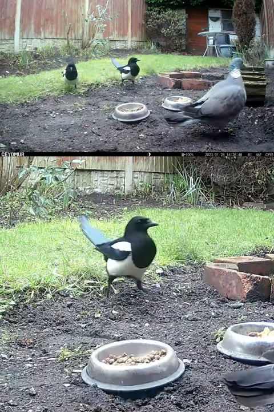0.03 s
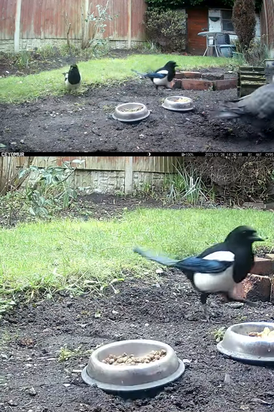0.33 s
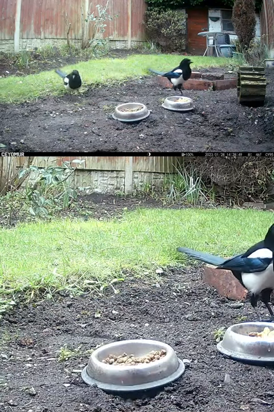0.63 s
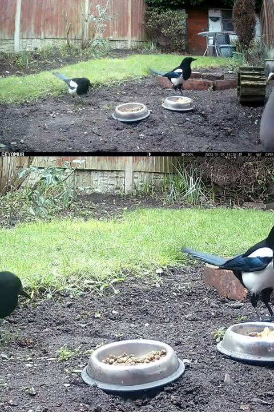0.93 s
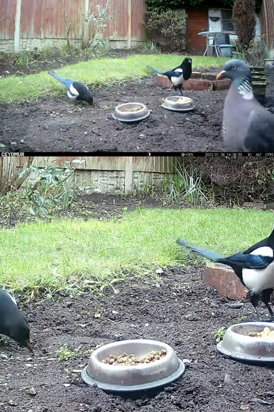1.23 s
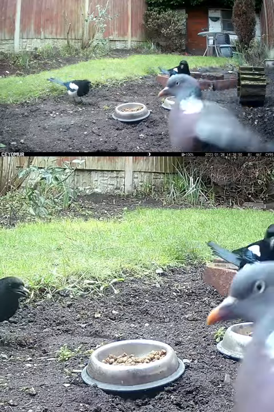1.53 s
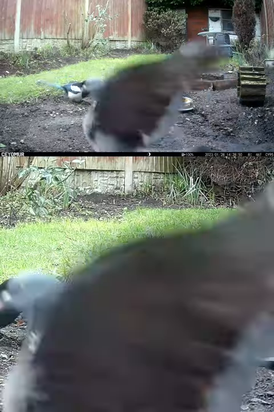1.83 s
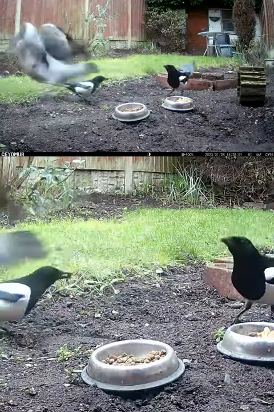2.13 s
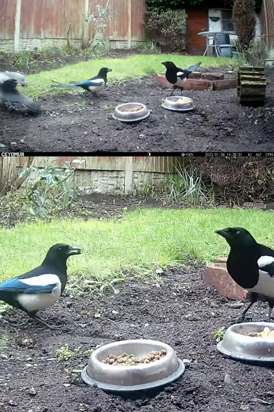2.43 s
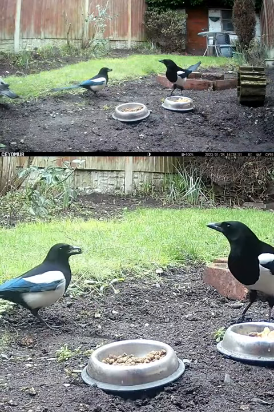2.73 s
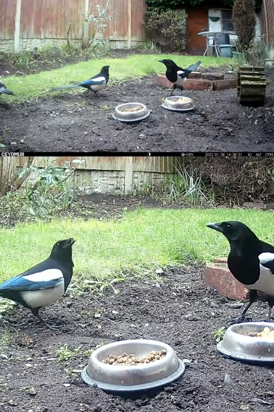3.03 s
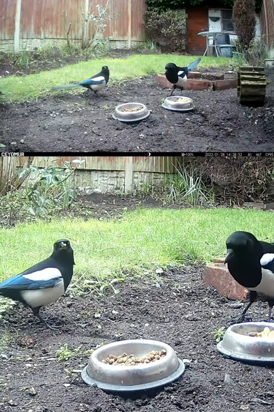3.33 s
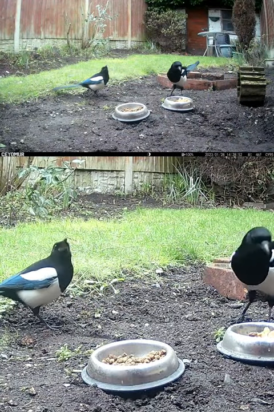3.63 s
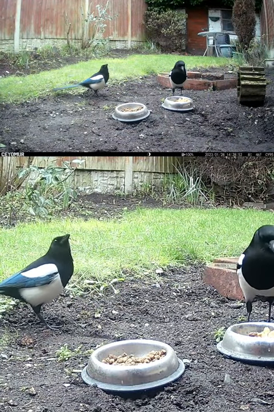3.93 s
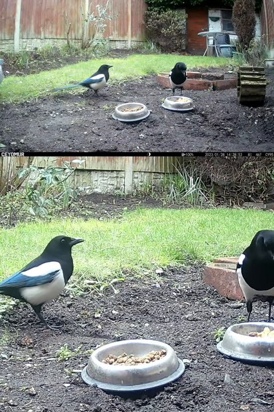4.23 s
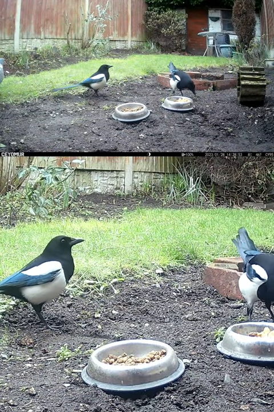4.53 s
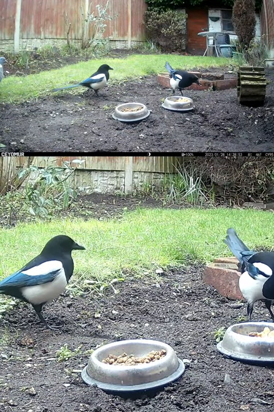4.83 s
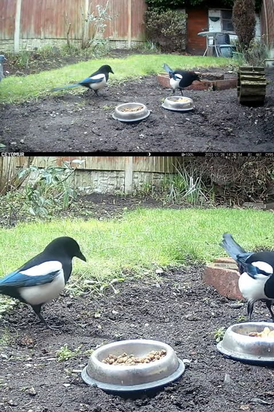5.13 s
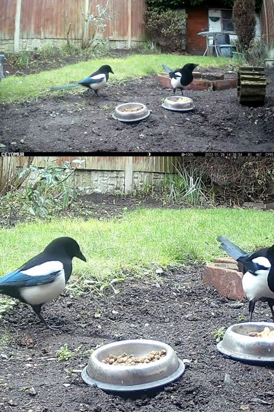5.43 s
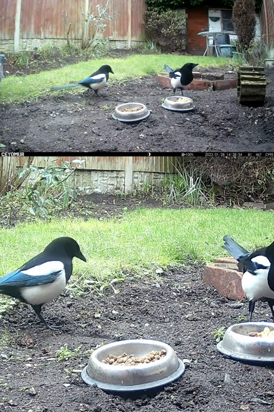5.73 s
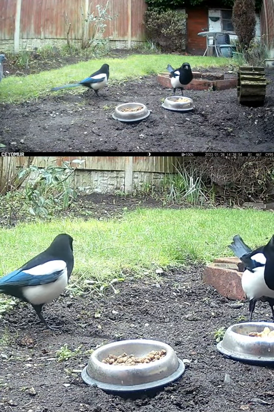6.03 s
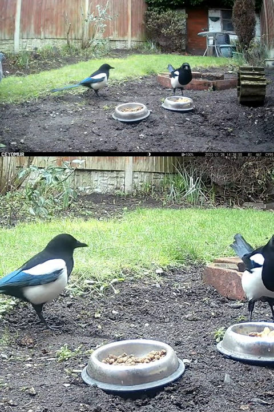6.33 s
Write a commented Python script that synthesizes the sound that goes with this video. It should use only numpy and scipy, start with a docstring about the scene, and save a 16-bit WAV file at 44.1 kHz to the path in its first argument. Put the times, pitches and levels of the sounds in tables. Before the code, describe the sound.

A pigeon steps softly over soil, then takes off close by with rustling feathers and dull wing claps, over quiet hiss and faint electronic blips.

```python
"""A wood pigeon walks past a trail camera on the ground of a garden and takes off right in front of it.
Its feet thud on soft soil, grit clicks, and its feathers rustle as they slide over each other.
The wings push air at the microphone, make the camera's case ring and clap dully as the bird leaves.
Underneath are a distant low drone, a light breeze, the garden's murmur and the camera's own hiss,
with faint ticks and blips from its electronics."""
import sys
import numpy as np
from scipy import signal
from scipy.fft import rfft, irfft, next_fast_len
from scipy.io import wavfile
from scipy.ndimage import uniform_filter1d

SR = 44100
rng = np.random.default_rng(int(sys.argv[2]) if len(sys.argv) > 2 else 0)


def wrap_up_sound(samples):
    """Save the sound to the file named by the first command line argument, as 16-bit audio."""
    columns = np.atleast_2d(samples).T
    # keep every value between -1 and 1, then stretch to whole-number steps
    tamed = np.clip(columns, -1, 1)
    steps = np.round(tamed * 32767).astype(np.int16)
    wavfile.write(sys.argv[1], SR, steps)


N = 280917


def undb(db):
    """Turn decibels (dB) into a number to multiply a sound by."""
    return 10 ** (np.asarray(db) / 20)


def seconds():
    """The time of every sample."""
    return np.arange(N) / SR


def unit(x):
    """Scale a sound so that its average strength (rms) is 1."""
    return x / np.sqrt(np.mean(x ** 2))


def noise():
    """White noise: all pitches equally strong."""
    return rng.standard_normal(N)


def shape(x, gain_at):
    """Turn each frequency up or down by gain_at(hz); the result has strength 1."""
    size = next_fast_len(N, real=True)
    hz = np.maximum(np.fft.rfftfreq(size, 1 / SR), 1)
    return unit(irfft(rfft(x, size) * gain_at(hz), size)[:N])


def colour(x, points):
    """Make a sound duller or brighter, following a table of frequencies and relative levels."""
    hz, db = np.transpose(points)
    return shape(x, lambda f: undb(np.interp(np.log(f), np.log(hz), db)))


def resonate(x, hz, width):
    """Make a sound ring around one pitch; the result has strength 1."""
    return unit(signal.lfilter(*signal.iirpeak(min(hz, SR / 2 - 1), hz / width, fs=SR), x))


def swell(at, rise, fall):
    """A level that climbs smoothly to 1 at the given time, then dies away."""
    t = seconds() - at
    return np.exp(-np.minimum(np.where(t < 0, (t / rise) ** 2, t / fall), 20))


def drift():
    """A slow random wobble, a few times a second."""
    return shape(noise(), lambda f: 1 / (1 + (f / 4) ** 4))


def snap(at, hz, width, fall):
    """A tiny burst of noise around one pitch, with strength about 1 at its start."""
    burst = noise() * swell(at, 0.00025, fall)
    return resonate(resonate(burst, hz, width), hz, width) * np.sqrt(fall * SR / 2 / N)


# How the drone swells and fades. Each row: time in seconds, level in dB before trim_db is added.
DRONE_LEVELS = [(0.0, -70), (0.27, -53.5), (0.48, -63), (0.69, -51), (0.96, -64), (1.08, -51), (2.8, -54),
                (2.95, -58), (3.25, -51), (3.76, -50), (4.0, -58.5), (4.18, -50.5), (4.75, -63),
                (5.71, -54.5), (5.8, -75), (5.98, -60), (6.34, -55)]


def drone(hz=53.36, wander_hz=0.98, trim_db=-1):
    """A far-off, engine-like hum whose pitch wanders a little."""
    phase = 2 * np.pi * np.cumsum(hz + wander_hz * drift()) / SR
    level_db = np.interp(seconds(), *np.transpose(DRONE_LEVELS)) + trim_db
    return np.sqrt(2) * np.sin(phase) * undb(level_db)


# The pitches at which the camera's case rings. Each row: pitch in Hz, width in Hz,
# relative level in dB when a wing shakes it, base level in dB in the garden's murmur.
CASE_RINGS = [(458, 21.6, 12.5, -69.5), (716, 160, -1, -81), (978, 107, -36, -69.5), (1123, 57, 2.5, -71.5),
              (2880, 300, -3, -81.5)]
# The low rumble of the breeze. Each row: frequency in Hz, relative level in dB.
BREEZE_COLOUR = [(10, 0), (25, -2), (45, 2), (62, 0), (80, -14.5), (150, -17.5), (400, -50)]
# The air stirs more while the pigeon is near. Each row: time in seconds, change of level in dB.
AIR_STIR = [(0, 0), (2.4, 4.0), (2.9, 0), (6.4, -1.5)]


def garden_air(breeze_db=-59, waver_db=0.8):
    """A light breeze blows, and the garden's murmur is heard through the ringing case."""
    change_db = waver_db * drift() + np.interp(seconds(), *np.transpose(AIR_STIR))
    murmur = sum(undb(db) * resonate(noise(), hz, width) for hz, width, _, db in CASE_RINGS)
    breeze = undb(breeze_db) * colour(noise(), BREEZE_COLOUR)
    return (murmur + breeze) * undb(change_db)


# The tone of the hiss. Each row: frequency in Hz, relative level in dB.
HISS_COLOUR = [(20, 18.5), (60, 2.5), (108, 15), (160, 3), (330, 6.5), (600, 3.5), (1400, 3), (1850, 3.5),
               (2400, 0.83), (6000, -1), (9800, -1.5), (11500, -3), (13500, -1), (14800, -5.5),
               (15600, -5.5)]


def hiss(db=-57.5):
    """The microphone's amplifier hisses steadily."""
    return undb(db) * colour(noise(), HISS_COLOUR)


# Electrical ticks. Each entry: time in seconds.
TICK_TIMES = [0.0745, 0.6123, 1.0805, 2.7128, 3.0925, 4.0932, 4.813, 5.101, 6.1011]


def ticks(db=-47):
    """The camera's electronics leak short, high ticks into the sound."""
    return undb(db) * sum(snap(at, hz=9100, width=2800, fall=0.0012) for at in TICK_TIMES)


# The camera's bursts of work. Each row: start in seconds, length of a pause partway in seconds.
WORK_BURSTS = [(.125, 0), (.624, 0.0022), (1.122, 0.053), (2.488, 0.052), (3.088, 0), (3.622, 0.0043),
               (4.125, 0.0049), (4.630, .043), (5.121, 0.036), (5.626, .049)]
# Overtones of the camera's electronic clock. Each row: pitch in Hz, level in dB.
CLOCK_TONES = [(5513, -66.5), (8270, -78), (9648, -70), (12405, -65.5), (13783, -70)]


def blips(work_s=0.056, pause_after_s=0.023, rasp=0.24):
    """The clock's raspy whine leaks in while the camera works; each burst does equally long work."""
    t = seconds()
    busy = np.zeros(N)
    for at, pause in WORK_BURSTS:
        age = t - at
        before_pause = (age > 0) & (age < pause_after_s)
        after_pause = (age >= pause_after_s + pause) & (age < work_s + pause)
        busy += before_pause | after_pause
    busy = uniform_filter1d(busy, size=200)  # soften the switching on and off
    roughness = 1 + rasp * shape(noise(), lambda f: 1 / (1 + (f / 200) ** 2))
    whine = sum(np.sqrt(2) * undb(db) * np.sin(2 * np.pi * hz * t) for hz, db in CLOCK_TONES)
    return busy * roughness * whine


# The pigeon's steps. Each row: loudest moment in seconds, level in dB.
FOOTSTEPS = [(.338, -57.5), (.480, -52), (.743, -47.5), (1.072, -47.5), (1.640, -45.5), (1.885, -47.5),
             (2.412, -49)]
# The dull tone of soil. Each row: frequency in Hz, relative level in dB.
SOIL_COLOUR = [(30, -11.5), (70, -6), (110, 8), (160, -12), (220, -14.5), (400, -26.5), (800, -25.5),
               (2000, -47), (8000, -36)]


def steps():
    """Soil gives under the feet with a soft thud."""
    thuds = sum(undb(db) * swell(at, rise=0.021, fall=0.038) for at, db in FOOTSTEPS)
    return colour(noise(), SOIL_COLOUR) * thuds


# Small dry clicks. Each row: time in seconds, pitch in Hz, level in dB.
DRY_CLICKS = [(.4408, 9000, -55), (0.503, 700, -50), (.6735, 10200, -45), (0.725, 700, -44.5),
              (.9085, 12000, -48), (5.1085, 6900, -47)]


def clicks(widest_hz=3900):
    """Grit, claws and beak click now and then; low knocks cover a narrower range of pitches."""
    return sum(undb(db) * snap(at, hz, min(widest_hz, hz), fall=0.0017) for at, hz, db in DRY_CLICKS)


def barbs(per_s, spread_db):
    """A feather's tiny branches, its barbs, flick past each other in dense clicks of unequal size."""
    flicks = rng.random(N) < per_s / SR
    return unit(flicks * noise() * undb(spread_db * noise()))


# Sweeps of wing or tail. Each row: loudest moment in seconds, rise in seconds, fall in seconds,
# level in dB, pitch of the swish in Hz.
FEATHER_SWEEPS = [(.684, .01, .03, -58, 13000), (1.630, 0.033, .023, -48, 10400),
                  (1.668, 0.017, .007, -43.5, 8000), (1.763, 0.015, 0.015, -54, 8900),
                  (1.854, 0.026, 0.044, -44.5, 5430), (1.926, 0.014, 0.0059, -42, 2950),
                  (2.078, 0.03, 0.014, -56, 3030), (2.260, 0.024, 0.01, -51.5, 7000),
                  (2.40, .023, .06, -61.5, 9000)]
# The tone of feathers. Each row: frequency in Hz, relative level in dB.
FEATHER_COLOUR = [(200, 7), (650, 1.5), (1000, 11), (1400, 2), (3500, 3), (6000, 5), (10000, 5.5),
                  (13300, 6), (15500, -0.5)]


def rustle(swish_gain=0.5, settle_db=-14, settle_s=0.11):
    """Feathers slide over each other, each sweep with its own swish, then settle quietly."""
    grains = colour(barbs(per_s=16000, spread_db=3.0), FEATHER_COLOUR)
    fibres = barbs(per_s=12000, spread_db=4.5)
    out = 0
    for at, rise, fall, db, hz in FEATHER_SWEEPS:
        width = 0.22 * hz
        swish = resonate(resonate(fibres, hz, width), hz, width)
        sweep = unit(grains + swish_gain * swish) * swell(at, rise, fall)
        settle = undb(settle_db) * grains * swell(at + fall, rise, settle_s)
        out += undb(db) * (sweep + settle)
    return out


# Gusts from the wings. Each row: time in seconds, then levels in dB of the pull, swirl and case ring.
WING_GUSTS = [(1.660, -34, -40, -54), (1.936, -15, -33, -41), (2.079, -31, -40.5, -53.5),
              (2.181, -37, -34.5, -78), (2.22, -34, -38.5, -70), (2.274, -39, -51, -60)]
# The deep tone of swirling air. Each row: frequency in Hz, relative level in dB.
SWIRL_COLOUR = [(8, 4.5), (25, -6), (55, -5), (90, -18), (130, -21.5), (190, -38), (330, -32), (700, -67),
                (2000, -60)]


def wing_air(pull_half_s=0.01):
    """A passing wing pushes, pulls and pushes the air; it swirls, and the draught rings the case."""
    swirl = colour(noise(), SWIRL_COLOUR)
    draught = noise()
    ring = unit(sum(undb(db) * resonate(draught, hz, width) for hz, width, db, _ in CASE_RINGS))
    out = 0
    for at, pull_db, swirl_db, ring_db in WING_GUSTS:
        away = ((seconds() - at) / pull_half_s) ** 2  # below 1 the wing pulls, above 1 it pushes
        out += undb(pull_db) * (away - 1) * np.exp(-np.minimum(away / 2, 20))
        out += undb(swirl_db) * swirl * swell(at, rise=0.037, fall=0.063)
        out += undb(ring_db) * ring * swell(at, rise=0.023, fall=0.033)
    return out


# Dull wing claps, the first a quick run of slaps.
# Each row: time in seconds, pitch in Hz, level of the pop in dB, level of the flutter in dB.
WING_CLAPS = [(2.1027, 780, -29.5, -41), (2.1087, 230, -31, -46), (2.1122, 240, -24.5, -46),
              (2.2085, 460, -39, -44)]
# The tone of fluttering feather tips. Each row: frequency in Hz, relative level in dB.
FLUTTER_COLOUR = [(80, -4), (170, 6.5), (280, 8), (420, -7), (620, 10), (900, -13), (1200, -10),
                  (2000, -40)]


def claps(pop_half_s=0.0013):
    """Air squeezed out by the wings pops while the feather tips flutter; a low pop is a single push."""
    flutter = colour(noise(), FLUTTER_COLOUR)
    out = 0
    for at, hz, pop_db, flutter_db in WING_CLAPS:
        t = seconds() - at
        pop = np.cos(2 * np.pi * hz * t) * np.exp(-np.minimum((t / pop_half_s) ** 2, 20))
        out += undb(pop_db) * pop
        out += undb(flutter_db) * flutter * swell(at, rise=0.0063, fall=0.0057)
    return out


def scene():
    """The pigeon, the garden and the camera's own noise, added into one channel."""
    pigeon = rustle() + wing_air() + claps() + steps() + clicks()
    garden = drone() + garden_air()
    camera = blips() + ticks() + hiss()
    return (pigeon + garden + camera)[None]


def record(dry):
    """The camera steeply cuts off the very highest pitches."""
    top_hz = 15650
    return signal.sosfilt(signal.ellip(10, .1, 70, top_hz, fs=SR, output="sos"), dry)


dry = scene()
out = record(dry)
wrap_up_sound(out)
```